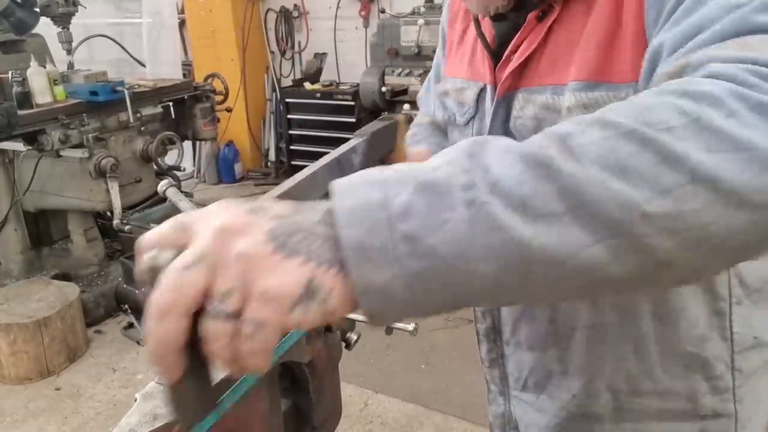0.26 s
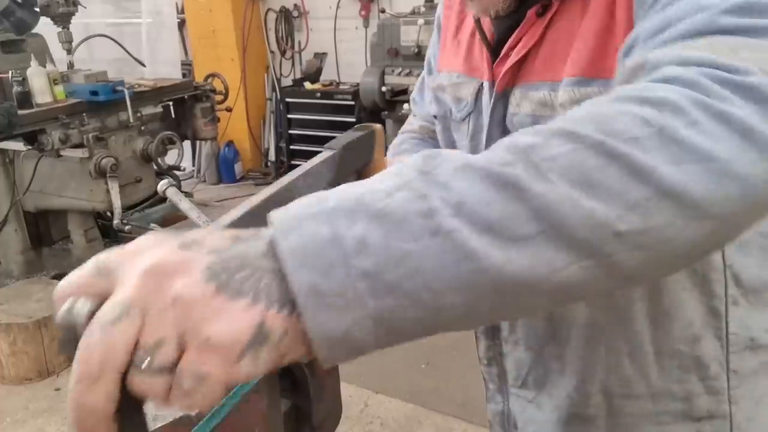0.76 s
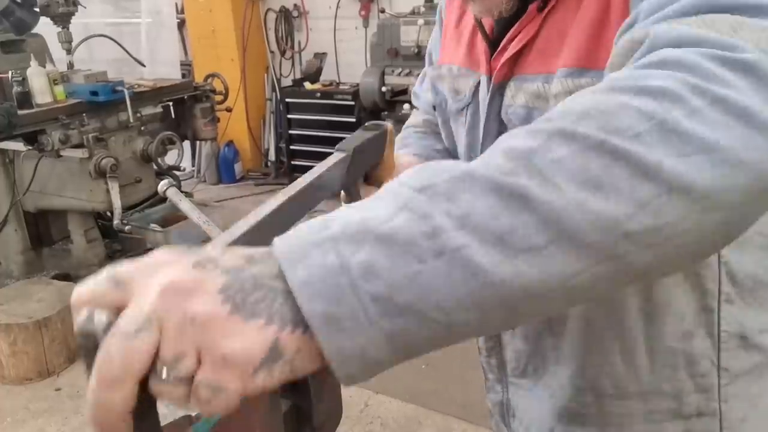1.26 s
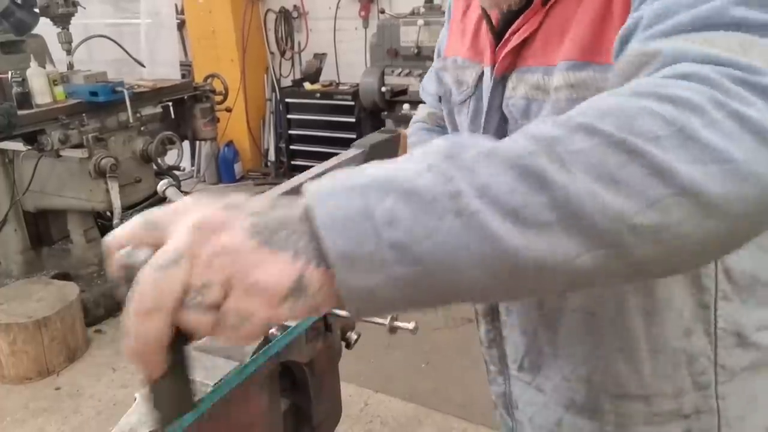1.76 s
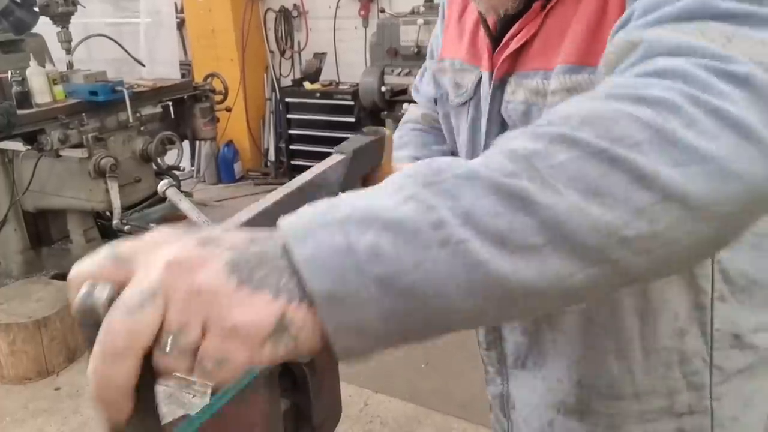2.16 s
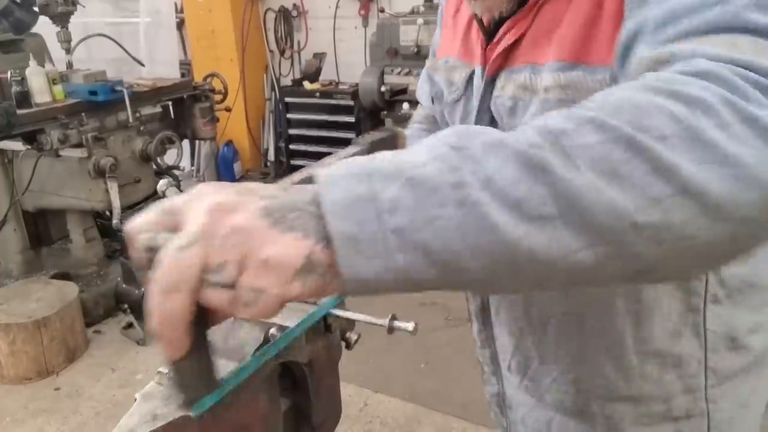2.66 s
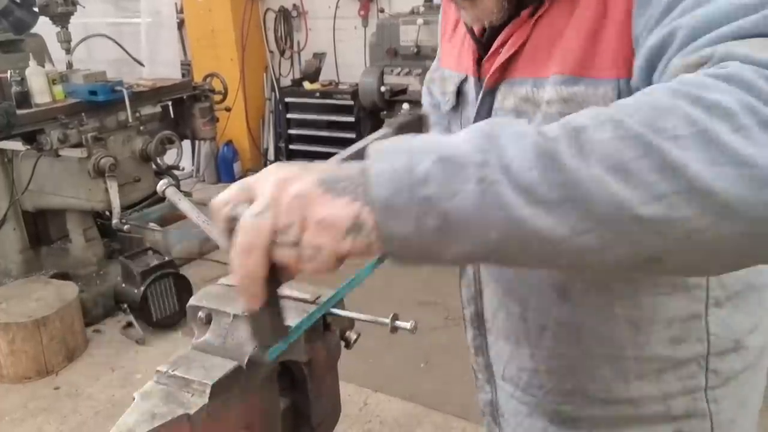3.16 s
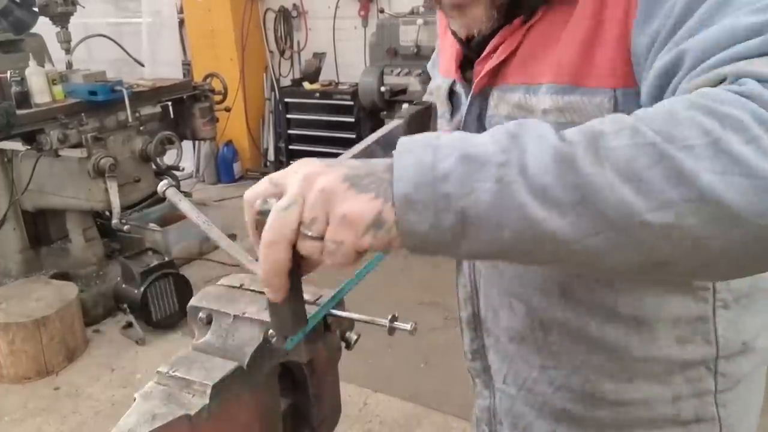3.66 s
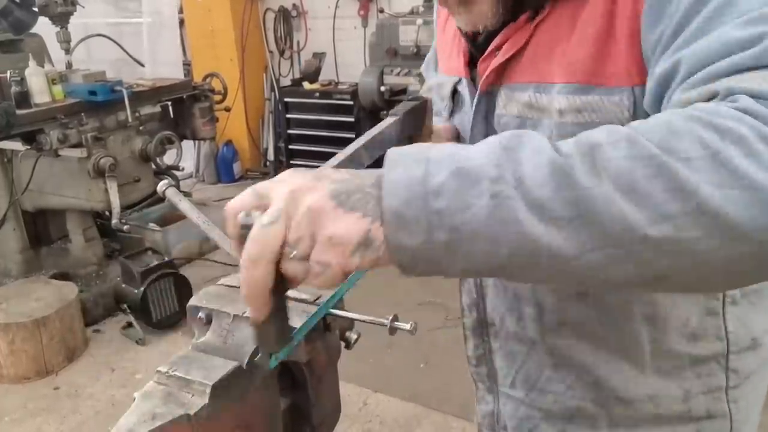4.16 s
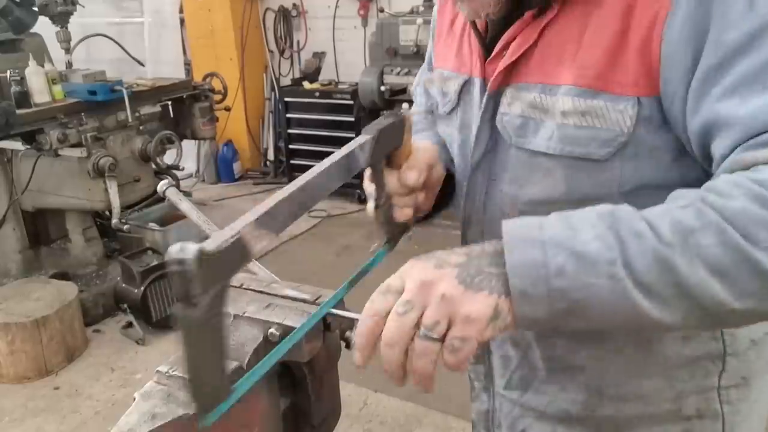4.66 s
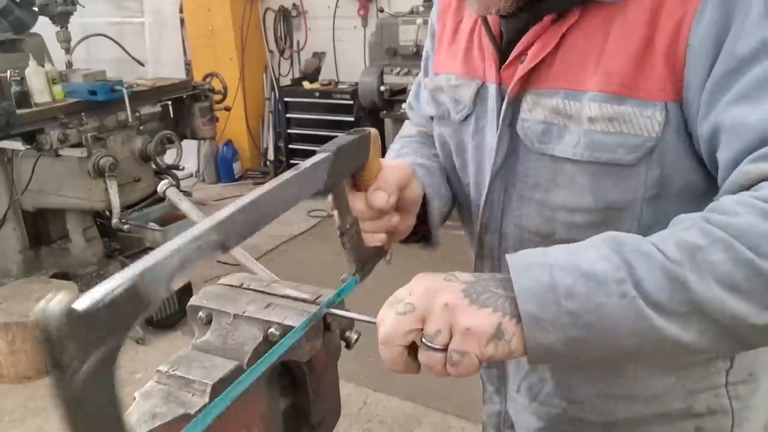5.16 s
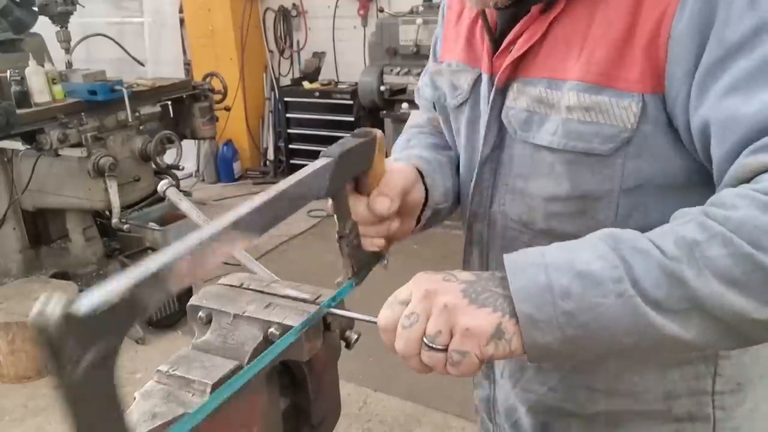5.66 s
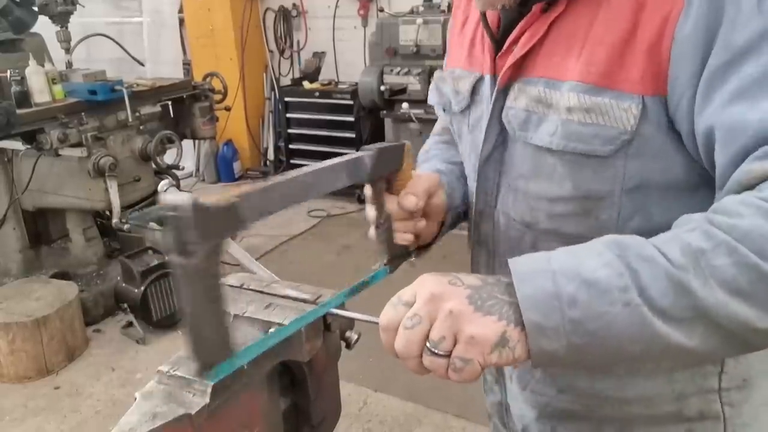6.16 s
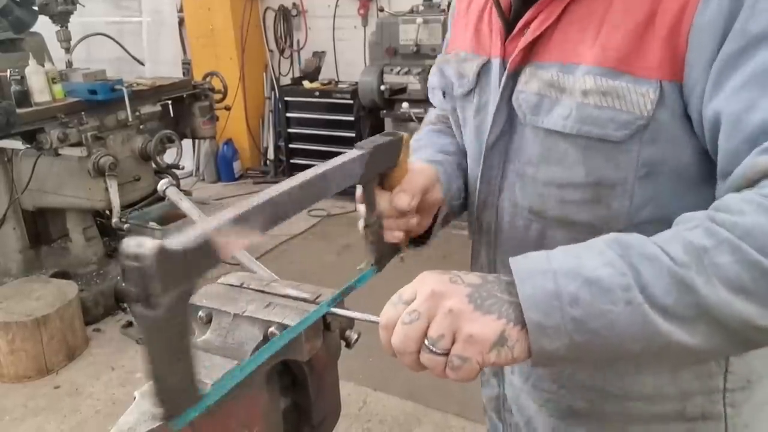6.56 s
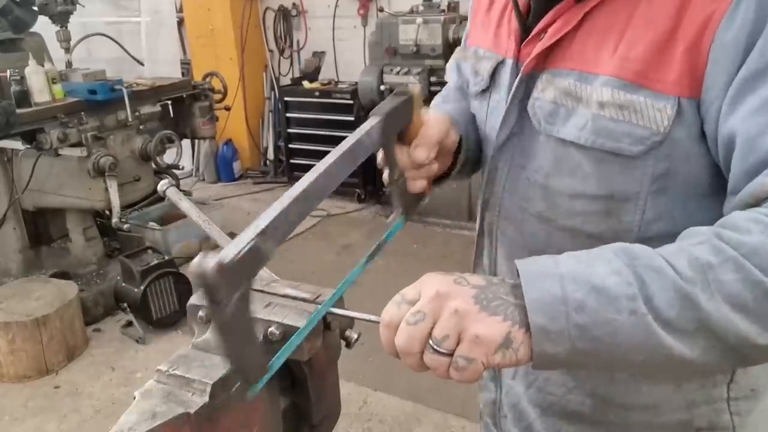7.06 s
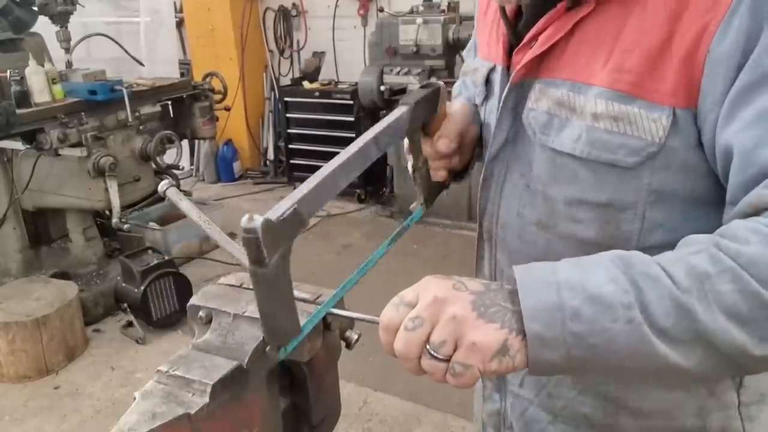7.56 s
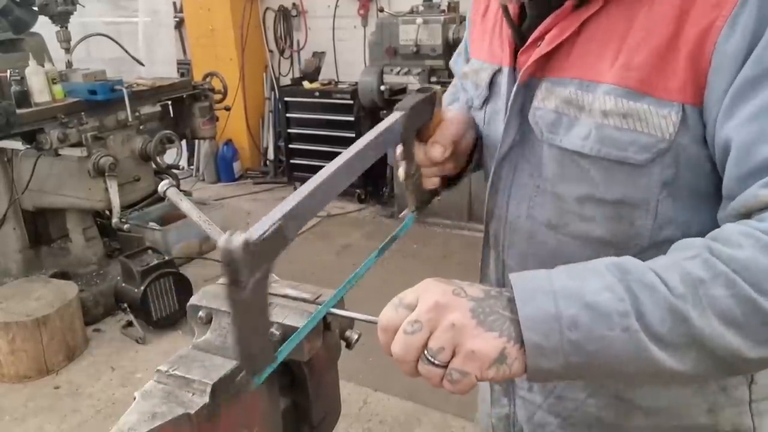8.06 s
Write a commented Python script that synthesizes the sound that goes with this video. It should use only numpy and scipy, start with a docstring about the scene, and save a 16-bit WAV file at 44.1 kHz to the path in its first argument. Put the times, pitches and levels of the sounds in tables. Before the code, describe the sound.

Close, brisk metal sawing: gritty push strokes with piercing mid-high squeals, softer pulls and brief squeaks, machine drone underneath in an echoing workshop.

```python
"""From the start a hand hacksaw rasps through a steel bolt in a vise, close to a phone in a workshop.
Its teeth ring the bolt, most of whose modes sink as the notch deepens, and the blade squeaks briefly.
On most pushes the blade chatters on the bolt's first mode into a squeal that bends up, then sags.
Halfway the steadying hand lets go of the frame and the squeals start to throb.
A machine hums throughout, and filtered noise tails give the steel's ring and the room's short echo."""
import sys
import numpy as np
from scipy import signal
from scipy.fft import rfft, irfft, next_fast_len
from scipy.io import wavfile
from scipy.ndimage import uniform_filter1d

SR = 44100
rng = np.random.default_rng(int(sys.argv[2]) if len(sys.argv) > 2 else 0)


def store_pcm(level_fs):
    """Save levels as 16-bit WAV."""
    pcm = np.round(np.clip(level_fs, -1, 1) * 32767).astype(np.int16)
    wavfile.write(sys.argv[1], SR, np.atleast_2d(pcm).T)


N = 366471
TIME = np.arange(N) / SR

# Levels in the tables are relative: the mix trims them further.
# saw strokes, pull and push by turns, a pull first: start t/s, fastest t/s, rasp level/dB, top tooth rate f/Hz
SAW_STROKES = [(-.059, 0.042, -26.5, 1087), (0.143, 0.256, -18.5, 992), (0.372, 0.508, -29, 1020),
               (0.602, 0.712, -18.5, 1004), (0.83, 0.933, -34, 1165), (1.055, 1.166, -22, 958),
               (1.276, 1.393, -31, 1142), (1.47, 1.627, -19.5, 983.8), (1.728, 1.842, -31, 1086),
               (1.927, 2.052, -18, 1054), (2.172, 2.29, -30.5, 900), (2.365, 2.491, -17, 1130),
               (2.607, 2.735, -36, 970), (2.813, 2.916, -18.5, 1135), (3.04, 3.175, -30, 997),
               (3.239, 3.349, -18.5, 1051), (3.481, 3.601, -32.5, 978), (3.681, 3.797, -18.5, 1096),
               (3.934, 4.07, -30, 1000), (4.137, 4.244, -20, 1065), (4.373, 4.486, -35.5, 936),
               (4.561, 4.697, -21.5, 973), (4.794, 4.95, -35, 863), (5.002, 5.147, -23, 1066),
               (5.248, 5.366, -32, 952), (5.437, 5.555, -21, 1152), (5.674, 5.75, -28, 958),
               (5.868, 5.996, -19, 1062), (6.087, 6.19, -33, 910), (6.289, 6.432, -21, 1188),
               (6.517, 6.646, -28.5, 904), (6.714, 6.813, -15, 977), (6.991, 7.037, -31, 983),
               (7.165, 7.257, -16.5, 1059), (7.405, 7.463, -27.5, 998), (7.591, 7.709, -19.5, 1138),
               (7.838, 7.894, -34, 990), (8.02, 8.146, -16.5, 1188), (8.274, 8.313, -29, 1170)]
# chatter on the bolt's first mode: loudest t/s, rise from 20 dB down t/s, fall to 20 dB down t/s,
# level/dB, bend above the mode f/Hz
CHATTER_SQUEALS = [(0.25, 0.06, 0.094, -11, 35), (0.716, 0.053, 0.087, -12, 48),
                   (1.162, 0.063, 0.088, -14, 64), (1.611, .059, 0.097, -13.5, 54),
                   (2.034, 0.04, 0.11, -14.5, 72), (2.486, 0.043, 0.052, -10.5, 76),
                   (2.92, 0.071, 0.049, -12.5, 80), (3.349, 0.059, 0.079, -13.5, 69),
                   (3.783, 0.068, 0.091, -14.5, 57), (4.219, 0.053, 0.11, -12.5, 69),
                   (4.663, 0.095, 0.059, -23.5, 80), (5.132, 0.074, 0.086, -12, 28),
                   (5.575, 0.11, 0.055, -21.5, 23), (6.003, 0.1, 0.041, -14, 96),
                   (6.412, .032, 0.057, -11, 80), (6.816, .042, 0.089, -12.5, 20),
                   (7.72, 0.069, 0.057, -12, 50), (8.154, 0.054, 0.051, -11.5, 34)]
# brief squeaks of the blade: middle t/s, length t/s, pitch f/Hz, level/dB
BLADE_SQUEAKS = [(0.048, 0.13, 4290, -30), (0.497, 0.059, 1453, -24), (0.526, 0.076, 4320, -32.5),
                 (0.915, 0.12, 1460, -26.5), (1.387, .072, 4316, -26), (1.445, 0.065, 1469, -24),
                 (1.836, .06, 4280, -29), (2.29, 0.056, 1459, -20), (2.428, 0.06, 1434, -23.5),
                 (2.72, 0.043, 1445, -23.5), (3.07, 0.036, 1440, -23.5), (3.155, .037, 1446, -21.5),
                 (3.617, .074, 1457, -23), (4.06, 0.103, 1450, -25.5), (4.478, .11, 1429, -24.5),
                 (4.692, 0.068, 8380, -24.5), (4.864, 0.028, 1418, -22), (5.596, 0.027, 3990, -23),
                 (6.664, 0.032, 1408, -18), (6.855, 0.038, 3928, -18.5), (7.031, 0.017, 1385, -17),
                 (7.269, 0.097, 3816, -13.5), (7.319, 0.025, 1387, -14.5)]
# judders of the lightly loaded saw frame: middle t/s, length t/s, pitch f/Hz, level/dB
FRAME_JUDDERS = [(0.488, .12, 152, -35), (0.996, 0.15, 186, -30), (1.435, 0.27, 180, -33),
                 (1.859, 0.1, 181, -34.5), (3.184, .12, 186, -31.5), (4.072, 0.12, 187, -32),
                 (5.745, 0.1, 155, -38.5), (7.451, 0.088, 173, -35.5), (7.639, 0.065, 146, -37.5),
                 (7.961, 0.12, 159, -42)]
# upper modes of the bolt and the blade in its notch: first f/Hz, last f/Hz, width f/Hz,
# level with the frame held/dB, level let go/dB
UPPER_MODES = [(4298, 3750, 52, 5, 3), (8790, 7900, 320, 1.5, -19), (13980, 15000, 790, 3.5, -36),
               (14570, 11000, 44, 4, -36), (2910, 3600, 230, -2, -10), (2195, 1700, 540, -8, -6),
               (3910, 3750, 280, -8, 1.5)]
# harmonics of the chatter, from the first up: left level/dB, right level/dB
CHATTER_HARMONICS = [(1, 1.5), (-6.5, -9), (-10.5, -9.5), (-11, -13), (-10, -24), (-10.5, -24)]
# rasp colour on the push: f/Hz, level/dB
PUSH_COLOUR = [(100, -27), (300, -27), (500, -6.5), (900, -3.5), (1900, 1), (2500, 0), (3300, 4.5),
               (6000, 1.5), (6900, -4), (7700, 6), (9000, 1), (10000, -4), (12000, -2.5), (14000, 0),
               (15800, -6)]
# rasp colour on the pull: f/Hz, level/dB
PULL_COLOUR = [(100, -37), (300, -13), (500, -1.5), (900, 6), (1900, 8.5), (2500, 9), (3700, 9.5),
               (5500, 5.5), (6500, 2), (7800, 7), (10500, -3.5), (12500, -4.5), (14000, 1.5), (15800, -9)]
# lean of the cut, mostly to the left: f/Hz, left over right level/dB
STEREO_LEAN = [(300, 1), (1000, 3.5), (4000, 1), (8000, 6), (11000, -1.5), (13000, 14), (15000, 7.5)]
# spectrum shape of the workshop background: f/Hz, level/dB
SHOP_COLOUR = [(20, -21), (45, -2), (60, 0.5), (73, 19), (88, 9), (115, 5), (170, -8), (260, -15),
               (350, -2), (480, -14.5), (1000, -11), (4000, -38), (15000, -130)]
# the teeth break free after a turn and ping the bolt: t/s, level/dB
TOOTH_CATCHES = [(.404, -30), (.642, -29), (2.854, -19), (3.699, -33), (3.952, -25.5), (4.406, -24),
                 (4.603, -20), (5.28, -23.5), (5.483, -21.5), (5.922, -14.5), (6.129, -25), (6.546, -25),
                 (7.204, -20.5), (7.637, -25), (7.684, -8.5), (7.87, -46)]
# gain of the cut's treble: t/s, level/dB
TREBLE_GAIN = [(0, .5), (4.3, 2), (4.7, 2.5), (5.15, 4), (5.55, -1.5), (6, 0.5), (6.4, 1.5), (6.85, 1),
               (7.7, 1), (8.3, 1.5)]
# the blade's tooth note comes and goes, and is weak by the end: t/s, level/dB
TOOTH_NOTE_GAIN = [(0, -12), (.7, 0.5), (1.15, -13), (2, -2), (5.1, -3.5), (6, -7), (6.8, -4), (7.2, -13),
                   (8.3, -13)]

LET_GO_S = 4.18  # the steadying hand leaves the frame
FIRST_MODE_HZ, LAST_MODE_HZ, MODE_WIDTH_HZ = 1495.3, 1372, 87.5  # the bolt's first mode, start to end
# each two-handed push flexes the frame just after its fastest moment; level relative to its rasp
FLEX_LAG_S, FLEX_LENGTH_S, FLEX_HZ, FLEX_DB = 0.0325, 0.098, 206, -17
# each catch also scrapes; level relative to its ping
SCRAPE_DB, SCRAPE_DECAY_S = -18, 0.036
# each two-handed push bites in just before its fastest moment; level relative to its rasp
BITE_LEAD_S, BITE_DECAY_S, BITE_DB = .034, 0.029, -14
# a squeal starts flat by DRAG_HZ, bends up, then sags
THROB_HZ, DRAG_HZ, BEND_TIME_S, SAG_HZ_PER_S = 31.8, 24.68, 0.0076, 120
# the bolt rings on past a squeal's loudest moment; level relative to the squeal
RING_OUT_DB, RING_OUT_DECAY_S = -21, 0.069

# how the saw behaves under each grip: (two hands, one hand)
NEAR_REST_DB = (-45.5, -66)  # rasp left at the turn into a push
FAR_REST_DB = (-50, -84)  # and at the turn into a pull
PUSH_PEAKEDNESS = (1.3, 0.7)  # how narrowly the rasp gathers round the fastest moment
PULL_PEAKEDNESS = (1.56, 0.46)
RING_DB = (-28, -30.5)  # drive of the bolt's first mode, before it follows the speed
SQUEAL_SQUARENESS = (1.79, 2.35)  # higher: a flatter top and more abrupt ends
THROB_SWING_DB = (0, 3.5)  # the squeal dips by twice this at each throb
BEND_LEAD_S = (.013, -0.00397)  # the upward bend comes this long before the loudest moment
# a loaded push raises the modes that start below the limit
STIFFEN_HZ, STIFFEN_BELOW_HZ = (380, 150.6), 6000


def undb(db):
    """Decibels to gain."""
    return 10 ** (np.asarray(db) / 20)


def unit(x):
    """Scale to rms 1."""
    return x / np.sqrt(np.mean(np.abs(x) ** 2))


def colour(x, points):
    """Filter by a spectrum of (Hz, dB) points, joined evenly over log frequency."""
    size = next_fast_len(N)
    hz, db = np.transpose(points)
    log_hz = np.log(np.fft.rfftfreq(size, 1 / SR) + 1)
    gain = undb(np.interp(log_hz, np.log(hz), db))
    return irfft(rfft(x, size) * gain, size)[..., :N]


def wander(rate_hz):
    """Smooth chance with rms 1: noise through two equal low-pass poles."""
    pole = np.exp(-2 * np.pi * rate_hz / SR)
    return unit(signal.lfilter([1], [1, -2 * pole, pole ** 2], rng.standard_normal(N)))


def turn(hz):
    """Running phase of a moving frequency."""
    return 2 * np.pi * np.cumsum(hz) / SR


def resonance(hz, width_hz):
    """A randomly driven mode whose centre may move; rms about 1."""
    phase = turn(hz)
    return wander(width_hz / 2) * np.cos(phase) + wander(width_hz / 2) * np.sin(phase)


def swell(middle, length):
    """A rounded rise and fall."""
    return np.sin(np.pi * np.clip((TIME - middle) / length + .5, 0, 1))


def noise_tail(t, t60_s):
    """Two independent decaying noises, one for each ear."""
    return rng.standard_normal((2, len(t))) * undb(-60 * t / t60_s)


def unit_energy(tail):
    """Scale each ear's tail to energy 1."""
    return tail / np.sqrt(np.sum(tail ** 2, axis=1, keepdims=True))


def grip(pair, change_s=0.24):
    """A setting that passes from its two-handed to its one-handed value."""
    return np.interp(TIME, [LET_GO_S, LET_GO_S + change_s], pair)


def drifting(first_hz, last_hz):
    """A mode slides ever faster from its first to its last pitch as the notch deepens."""
    return first_hz + (last_hz - first_hz) * (TIME / TIME[-1]) ** 1.8


def shop(floor_db=-45, side_db=-17):
    """A machine's low drone and the hush of the room, both from shaped noise."""
    mid, side = (unit(colour(rng.standard_normal(N), SHOP_COLOUR)) for _ in range(2))
    return undb(floor_db) * (mid + undb(side_db) * side * np.array([[1], [-1]]))


def motion(push_power=2.5, pull_power=0.46, stuck=0.13):
    """The arm's swing: blade speed, rasp and ring levels, tooth rate, direction and how cleanly the teeth bite."""
    start, fastest, rasp_db, top_tooth_hz = np.transpose(SAW_STROKES)
    marks = np.maximum.accumulate(np.c_[start, fastest].ravel())
    # counts strokes: whole at each turn, half at each fastest moment
    swing = np.interp(TIME, marks, np.arange(len(marks)) / 2)
    stroke = swing.astype(int)
    is_push = stroke % 2
    speed = np.abs(np.sin(np.pi * swing))

    reach = (1 + np.cos(np.pi * swing)) / 2
    rest_db = reach * grip(FAR_REST_DB) + (1 - reach) * grip(NEAR_REST_DB)
    peakedness = np.where(is_push, grip(PUSH_PEAKEDNESS), grip(PULL_PEAKEDNESS))
    rasp = undb(rest_db + (rasp_db[stroke] - rest_db) * speed ** np.abs(peakedness))

    # the first mode is not driven until the blade moves fast enough
    ring = undb(grip(RING_DB)) * np.clip(speed - stuck, 0, 1) ** 0.78
    pushing = uniform_filter1d(is_push * 1., size=600)
    tooth_hz = top_tooth_hz[stroke] * speed ** np.where(is_push, push_power, pull_power)
    # the teeth bite evenly while the saw gathers speed and skid as it slows
    even = (0.87 + 0.92 * np.sin(2 * np.pi * swing)) * np.clip(tooth_hz / 950, 0, 1) ** 4
    return speed, rasp, ring, tooth_hz, pushing, even


def snags(per_s=45, decay_s=0.02, depth=0.35):
    """Teeth catch suddenly and let go slowly: random hits with decaying tails; rms 1."""
    hits = (rng.random(N) < per_s / SR) * rng.uniform(1.0, 3.4, N)
    pole = np.exp(-1 / (decay_s * SR))
    return unit(1 + depth * signal.lfilter([1], [1, -pole], hits))


def teeth(rasp, tooth_hz, pushing, even, bite=0.41, grit_db=-2.5, buzz_db=-3, note_db=-3, hiss_db=6.5,
          pull_db=-3, count=11):
    """Each tooth tears a chip: a burst of hiss, and a buzz whose partials glide with blade speed."""
    phase = turn(tooth_hz * (1 + .022 * wander(83.2)))
    force = unit((1 + bite * np.cos(phase)) * undb(grit_db * wander(1120)))

    partials = 0
    for k in range(2, count):
        partial = np.sin(k * phase + 0.38 * wander(93))
        partials = partials + partial * undb(2.7 * wander(6.5)) / k ** 0.13
    buzz = undb(buzz_db) * even * unit(partials) * (0.82 + 0.18 * pushing)
    snagged_rasp = rasp * snags()
    hiss = undb(hiss_db) * force * rng.standard_normal((2, N))
    chips = snagged_rasp * (hiss + buzz)

    # the tooth note itself grows only as the root of the rasp
    note_level = undb(-28.0) * (rasp / undb(-38.0)) ** .5
    note = np.sin(phase) * undb(2.3 * wander(13.5) + note_db) * even * note_level
    note = note * undb(np.interp(TIME, *np.transpose(TOOTH_NOTE_GAIN)) + pull_db * (0.5 - pushing))
    return colour(chips * pushing, PUSH_COLOUR) + colour(chips * (1 - pushing), PULL_COLOUR) + note


def pressure(speed, pushing, lag_s=.03):
    """The load on the blade, 0-1; it trails the speed of a push."""
    pole = np.exp(-1 / (lag_s * SR))
    return signal.lfilter([1 - pole], [1, -pole], pushing * speed ** 2)


def bolt(rasp, ring, load, upper_db=-1, ping_s=0.0068, settle_s=0.34):
    """The teeth ring the bolt's bending modes; a catch adds a quick ping on the first."""
    let_go = np.clip((TIME - LET_GO_S - settle_s) / 0.62, 0, 1)
    upper = 0
    for first_hz, last_hz, width_hz, held_db, free_db in UPPER_MODES:
        stiffening = grip(STIFFEN_HZ) * load * (first_hz < STIFFEN_BELOW_HZ)
        centre = drifting(first_hz, last_hz) + stiffening
        ears = np.array([resonance(centre, width_hz) for _ in range(2)])
        upper = upper + undb(held_db + (free_db - held_db) * let_go) * ears

    pings = 0
    for s, db in TOOTH_CATCHES:
        age = np.clip((TIME - s) / ping_s + .5, 0, 20)
        pings = pings + undb(db) * age * np.exp(1 - age)
    hz = drifting(FIRST_MODE_HZ, LAST_MODE_HZ)
    first = ring * resonance(hz, MODE_WIDTH_HZ) + pings * np.sin(turn(hz))

    # a hard-pressed blade damps the upper modes: their drive levels off as the rasp grows
    drive = rasp / (1 + rasp / undb(-12.0))
    return undb(upper_db) * drive * upper, first * np.array([[1.12], [.85]])


def frame(speed, glide=0.29, rattle_db=-42):
    """The bow of the saw flexes, rising in pitch as the hand loads it, over a low rattle that follows speed."""
    flexes = [(s + FLEX_LAG_S, FLEX_LENGTH_S, FLEX_HZ, db + FLEX_DB)
              for _, s, db, _ in SAW_STROKES[1::2] if s < LET_GO_S]
    flex = 0
    for s, length, hz, db in flexes + FRAME_JUDDERS:
        gliding_hz = hz * (1 + glide * np.clip((TIME - s) * 2, -1, 1))
        flex = flex + undb(db) * swell(s, length) * np.sin(turn(gliding_hz))
    rattle = undb(rattle_db) * speed * resonance(np.full(N, 170.), 56.3)
    return np.sqrt(2) * flex + rattle


def chirps(jitter=0.0031, second_db=-21, third_db=-21, lean_db=2.5):
    """Short squeaks of the blade, mostly near two of the bolt's modes, with two faint harmonics."""
    tones, waver = 0, 1 + jitter * wander(160)
    for s, length, hz, db in BLADE_SQUEAKS:
        tones = tones + undb(db) * swell(s, length) * np.exp(1j * turn(hz * waver))
    phase = np.angle(tones)
    wave = np.sin(phase) + undb(second_db) * np.sin(2 * phase) + undb(third_db) * np.sin(3 * phase)
    flutter = undb(wander(90) + np.array([[lean_db], [-lean_db]]))
    return np.sqrt(2) * np.abs(tones) * wave * flutter


def patchy(x, patchy_db=4.0):
    """Chips colour the cut differently from moment to moment: smoothed random gain over time and pitch."""
    cells = signal.stft(x, nperseg=256)[2]
    chance = uniform_filter1d(rng.standard_normal(cells.shape[1:]), size=4, axis=0)
    chance = uniform_filter1d(chance, size=7, axis=1)
    # the offset also lowers the whole cut
    return signal.istft(cells * undb(patchy_db * (unit(chance) - 2.5)))[1][:, :N]


def steel(x, t60_s=0.038, ring_db=-1):
    """The many close modes of blade, frame and vise ring on briefly after every chip."""
    tail = unit_energy(noise_tail(TIME[:SR // 8], t60_s))
    ringing = undb(ring_db) * signal.fftconvolve(x, tail, axes=1)[:, :N]
    return (x + ringing) / np.hypot(1, undb(ring_db))


def room(x, t60_s=0.83, wet_db=-16, treble_db=-5):
    """Diffuse echo of the workshop, different at each microphone."""
    t = TIME[:SR * 3 // 4]
    tail = unit_energy(noise_tail(t, t60_s) * (1 - np.exp(-t / 0.012)))
    echo = signal.fftconvolve(x, tail, axes=1)[:, :N]
    return undb(wet_db) * colour(echo, [(1500, 2), (5000, -4.5), (14000, treble_db)])


def squealing():
    """Level and pitch of the chatter: each squeal swells and fades, bending up as the blade bites."""
    rows = np.array(CHATTER_SQUEALS)
    nearest = np.searchsorted((rows[1:, 0] + rows[:-1, 0]) / 2, TIME)
    loudest, rise, fall, db, bend_hz = rows[nearest].T
    age = TIME - loudest
    fade_db = 20 * np.abs(age / np.where(age < 0, rise, fall)) ** grip(SQUEAL_SQUARENESS)
    throb_db = grip(THROB_SWING_DB) * (1 - np.cos(2 * np.pi * THROB_HZ * age))

    bitten = (1 + np.tanh((age + grip(BEND_LEAD_S)) / BEND_TIME_S / 2)) / 2
    bending_hz = bend_hz * bitten - DRAG_HZ * (1 - bitten)
    sag_hz = SAG_HZ_PER_S * np.maximum(age, 0)
    hz = drifting(FIRST_MODE_HZ, LAST_MODE_HZ) + bending_hz - sag_hz
    ring_out = undb(RING_OUT_DB) * bitten * np.exp(-np.abs(age) / RING_OUT_DECAY_S)
    return undb(db) * (undb(-fade_db - throb_db) + ring_out), hz


def chatter(flex, jitter=0.00395, flutter_db=2.0, sway=8, fray=0.29, lag_ms=0.056, squeal_db=0.2,
            bend_hz=75, soft=0.18):
    """Stick-slip squeals; the flexing frame rocks them and adds a side tone below."""
    size, hz = squealing()
    size = size * undb(squeal_db + flutter_db * wander(40))
    rocking = 1 + sway * np.conj(signal.hilbert(flex, next_fast_len(N))[:N])
    phase = turn(hz * (1 + jitter * wander(90.0))) + np.angle(rocking)
    size = size * np.abs(rocking)
    # pressure bends the pitch above the free mode and sharpens each slip: stronger overtones
    hardness = np.clip((hz - drifting(FIRST_MODE_HZ, LAST_MODE_HZ)) / bend_hz, soft, 1)
    lag = 2 * np.pi * FIRST_MODE_HZ * lag_ms / 1000  # the right ear's phase lead
    out = 0
    for k, (left_db, right_db) in enumerate(CHATTER_HARMONICS, 1):
        angle = k * phase + (k - 1) * fray * wander(120)
        wave = np.array([undb(left_db) * np.sin(angle), undb(right_db) * np.sin(angle + k * lag)])
        out = out + wave * size * (hardness if k > 1 else 1)
    return np.sqrt(2) * out


def scrapes():
    """Sudden rises of the rasp, each dying away, where the teeth break free or bite in."""
    catches = [(s, db + SCRAPE_DB, SCRAPE_DECAY_S) for s, db in TOOTH_CATCHES]
    bites = [(s - BITE_LEAD_S, db + BITE_DB, BITE_DECAY_S)
             for _, s, db, _ in SAW_STROKES[1::2] if s < LET_GO_S]
    return sum(undb(db) * (TIME > s) * np.exp(-np.abs(TIME - s) / decay) for s, db, decay in catches + bites)


def scene():
    """The saw close by, its cut leaning mostly left, in the workshop."""
    speed, rasp, ring, tooth_hz, pushing, even = motion()
    rasp = rasp + scrapes()
    flex = frame(speed)
    upper, first = bolt(rasp, ring, pressure(speed, pushing))
    # the light return stroke lets the upper modes sing
    upper = upper * undb(3.0 - 3.2 * pushing)
    chips = teeth(rasp, tooth_hz, pushing, even)
    cut = steel(patchy(chips + upper)) + first

    treble = colour(cut, [(3000, -28), (6000, 0)])
    treble_gain = undb(np.interp(TIME, *np.transpose(TREBLE_GAIN)))
    cut = cut + treble * (treble_gain - 1)
    # half of the lean goes to each ear
    cut = np.array([colour(ear, [(hz, side * db) for hz, db in STEREO_LEAN])
                    for ear, side in zip(cut, (.5, -.5))])
    saw = cut + chatter(flex) + chirps() + flex
    return saw + room(saw) + shop()


def record(dry, top_hz=15900):
    """The phone rounds the highest peaks and cuts the top with a steep low-pass."""
    rounded = dry / (1 + np.abs(dry / .92) ** 8) ** (1 / 8)
    return signal.sosfilt(signal.ellip(10, .2, 80, top_hz, fs=SR, output="sos"), rounded)


dry = scene()
out = record(dry)
store_pcm(out)
```